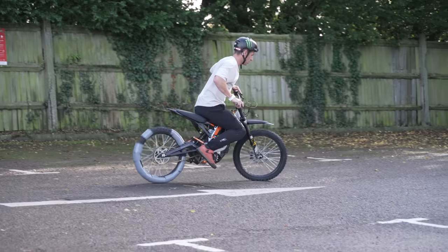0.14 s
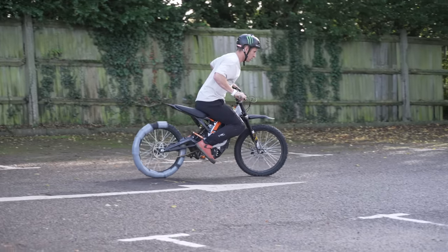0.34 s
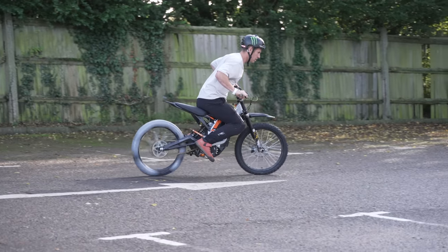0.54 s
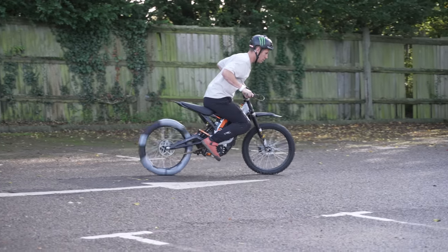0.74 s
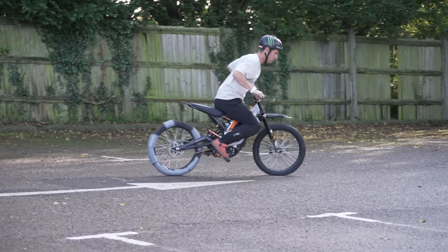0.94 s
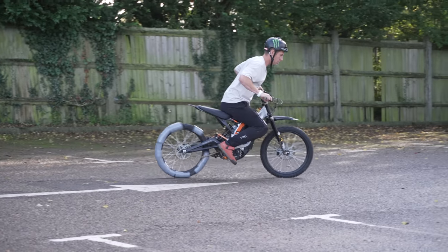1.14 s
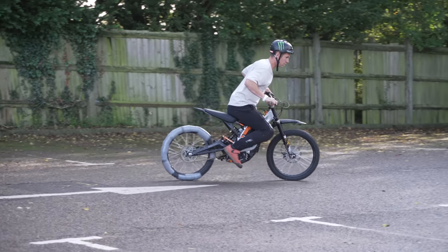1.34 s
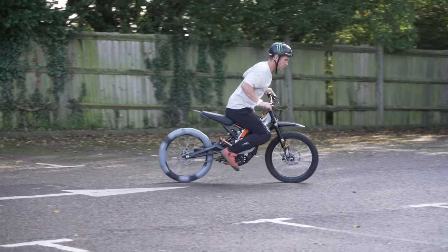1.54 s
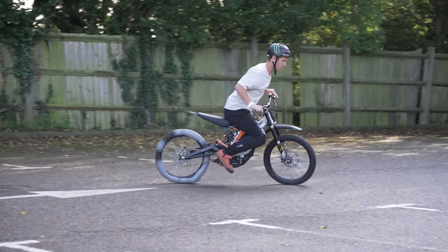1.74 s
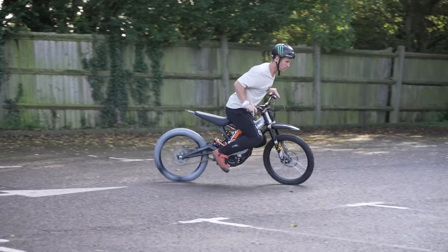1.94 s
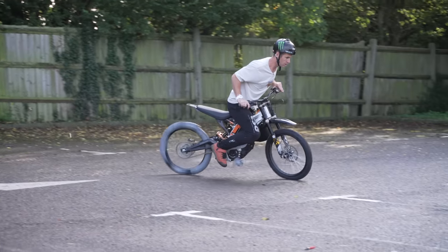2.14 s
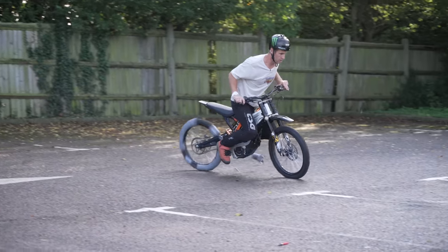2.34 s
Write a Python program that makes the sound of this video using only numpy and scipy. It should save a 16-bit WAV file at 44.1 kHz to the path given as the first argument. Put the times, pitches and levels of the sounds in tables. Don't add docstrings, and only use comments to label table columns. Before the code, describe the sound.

Brittle plastic guttering around a turning tyre rasps, knocks and creaks over gritty car park ground

```python
import sys
import numpy as np
from scipy import signal
from scipy.fft import rfft, irfft
from scipy.io import wavfile
from scipy.ndimage import uniform_filter1d

SR = 44100
rng = np.random.default_rng(int(sys.argv[2]) if len(sys.argv) > 2 else 0)


def voltage_ratio(level):
    return 10 ** (np.asarray(level, float) / 20)


def digitize_waveform(pressure):
    field = np.atleast_2d(pressure).T
    bounded = np.clip(field, -1, 1)
    quanta = np.round(bounded * 32767).astype(np.int16)
    wavfile.write(sys.argv[1], SR, quanta)


N = 110250

# start in seconds, length in seconds, pop level in dB, pop pitch in
# Hz, grit level in dB.
DRAGS = [(.43, 0.061, -43.5, 321.2, -45), (.488, 0.019, -40.5, 2318, -24.5),
         (0.523, 0.038, -32.5, 425.6, -22.5), (0.572, 0.016, -61, 593, -23),
         (.603, 0.012, -63, 1210, -24), (0.615, 0.044, -24, 465.2, -19.5),
         (.6885, 0.049, -26.5, 666.4, -23.5), (.88, 0.074, -37, 2060, -64),
         (.748, 0.013, -38, 900, -19.5), (0.774, 0.014, -36.5, 771, -21.5),
         (0.791, 0.033, -26, 892.6, -19), (0.825, 0.023, -52, 890, -29),
         (1.081, 0.037, -48, 374.5, -35.5), (1.477, 0.017, -43, 867, -28),
         (1.501, 0.005, -32, 960, -18), (1.513, 0.041, -32.5, 571.6, -27),
         (1.535, 0.019, -36, 357.4, -26), (1.606, 0.014, -66, 1480, -36),
         (1.642, 0.022, -42, 399.3, -29), (1.406, 0.0092, -51.5, 530, -50),
         (1.703, 0.048, -37.5, 1346, -64), (1.4, 0.069, -46.5, 399, -39),
         (1.575, 0.12, -43, 349, -38),
         (1.762, 0.014, -37.5, 897, -26.5), (1.77, 0.02, -28.5, 960, -26),
               (1.8, 0.012, -29.5, 923, -24), (1.82, 0.017, -52, 1177, -19),
               (1.857, 0.0056, -41, 785, -18.5), (1.925, 0.055, -64, 1260, -20),
               (1.982, 0.018, -30, 548, -21), (2.018, 0.047, -28.5, 959, -19),
               (2.063, 0.042, -27.5, 1138, -19.5), (2.114, 0.0065, -46, 960, -29),
               (2.132, 0.013, -53, 880, -25), (2.176, .016, -49, 795, -33), (2.194, 0.0096, -33, 763, -23),
               (2.222, 0.032, -31, 795, -23), (2.261, 0.02, -44, 906, -18), (2.323, 0.011, -46.5, 632, -18),
               (2.362, 0.017, -43.5, 781, -38), (2.44, 0.0095, -50, 818, -41),
               (2.493, .012, -26, 920, -22.5)]
# pitch in Hz, width in Hz, level in dB beside a 500 Hz pop.
SHELL_MODES = [(285, 115, -3.5), (381, 43, -12), (572, 14.4, -5)]
# frequency in Hz, level in dB.
GRIT_SPECTRUM = [(150, -3.5), (400, 2.5), (1200, 4), (2600, 2), (3800, 1.5), (7000, -6.5), (12500, -5.5),
                 (16000, -1)]
# time in seconds, level in dB.
RUB = [(0, -42.5), (.3, -39), (.48, -40), (.53, -24), (.85, -25.5), (.94, -29), (1.0, -33.5), (1.2, -40.5),
       (1.4, -51), (1.5, -32.5), (1.58, -32), (1.69, -38.5), (1.77, -19.5), (1.9, -22.5), (2.12, -21.5),
       (2.18, -21.5), (2.31, -24.5), (2.5, -27)]
# start in seconds, peak in dB, pitch in Hz, decay in seconds.
KNOCKS = [(0.211, -19, 1110, 0.023), (0.348, -16, 674, 0.018), (0.495, -6, 2980, 0.02),
          (0.528, -4, 1860, 0.02), (0.536, -10, 1160, 0.023), (0.554, -6, 2530, 0.034),
          (0.577, -8, 2830, 0.02), (0.639, -10, 565, 0.013), (0.689, 2, 2530, 0.038),
          (0.696, 1, 890, 0.015), (0.751, -11, 1720, 0.022), (0.793, -5, 1050, 0.02), (0.81, 4, 970, 0.015),
          (0.822, -1, 920, 0.02), (1.08, -12.5, 1400, 0.031), (1.17, -13.5, 1350, 0.016),
          (1.338, -15.5, 937, 0.026), (1.408, -6, 1760, 0.031), (1.476, -8, 1780, 0.02),
          (1.496, -10, 1200, 0.02), (1.5, -6.5, 990, 0.032), (1.515, -12, 590, 0.016),
          (1.543, -5, 630, 0.01), (1.61, -7.5, 1870, 0.023), (1.702, -17, 910, 0.015),
          (1.715, -9, 641, 0.04), (1.771, 4, 956, 0.017), (1.782, -8, 910, 0.02),
          (1.801, 3.5, 1050, 0.0093), (1.826, -2.5, 2370, 0.02), (1.859, -4.5, 600, 0.018),
          (1.93, -4, 2060, 0.02), (1.945, -13, 1400, 0.012), (1.968, -11, 1880, 0.02),
          (1.991, 4, 570, 0.02), (2.023, 0, 1230, 0.024), (2.039, -6, 2600, 0.018),
          (2.062, -6, 1170, 0.023), (2.091, -1, 1530, 0.023), (2.136, -11, 1380, 0.02),
          (2.194, -7, 750, 0.014), (2.222, -0.5, 1180, 0.045), (2.243, -4, 700, 0.018),
          (2.263, -9, 592, 0.031), (2.279, -14, 816, 0.02), (2.323, -8, 703, 0.033), (2.335, -8, 590, 0.02),
          (2.368, -4, 1360, 0.018), (2.441, -20, 826, 0.018)]
# start in seconds, peak in dB, centre in Hz, decay in seconds.
CRACKS = [(0.0369, -25, 4070, 0.044), (0.0876, -8.5, 8350, 0.015), (.153, -43, 3000, 0.07),
          (0.19, -38, 11000, 0.16), (0.196, -28, 10800, 0.067), (0.271, -30.5, 3020, 0.015),
          (.334, -28, 3830, 0.059), (0.95, -32.5, 13000, 0.066), (1.255, -44, 9400, 0.049),
          (1.002, -39, 4800, .02), (1.027, -31, 7650, 0.044), (1.031, -13, 6000, 0.0037),
          (1.0945, -21.5, 2740, 0.013), (1.112, -35, 5000, 0.017), (1.1517, -21.5, 1570, 0.031),
          (1.182, -35, 4400, 0.041), (1.22, -32, 5000, 0.017), (1.337, -28.5, 3900, 0.022),
          (1.3732, -31, 2530, 0.026), (1.408, -13, 2560, 0.023), (1.453, -24, 10900, 0.022),
          (1.732, -31.5, 11200, 0.15)]
# centre in seconds, peak in dB, pitch in Hz, length in seconds.
SQUEALS = [
    (0.307, -13, 1650, 0.00058),
    (0.494, -22, 2650, 0.0021),
    (.756, -20, 3750, 0.0032),
    (1.662, -13, 1220, 0.0041),
    (1.831, -15.5, 2560, 0.0034),
    (2.118, -10, 4000, 0.0019),
    (2.253, -15, 3670, 0.0045),
]
# time in seconds, slips per second, level in dB.
CREAK = [
    (.296, 730, -28),
    (.315, 690, -23),
    (0.332, 630, -22),
    (0.344, 460, -19),
    (0.349, 480, -13),
    (0.365, 620, -12.5),
    (0.371, 500, -10),
    (0.382, 400, -11),
]
# time in seconds, level in dB.
SLIPS = [(.2756, -24), (.282, -23), (0.288, -24), (0.292, -19), (0.4446, 2.5), (0.4628, 3), (0.479, 3),
         (0.5203, 3.5), (0.5378, -0.5), (1.456, 0.5), (1.4851, 4), (1.5583, 0.5), (1.7567, -0.5)]
# pitch in Hz, level in dB, 60 dB decay in seconds.
JOINT_MODES = [(3200, -30.5, 0.015), (5670, -9, 0.0036), (8780, -3, 0.0031), (9290, -1.5, 0.0034),
               (10000, -5.5, 0.0031), (11800, -9.5, 0.0034), (13300, -13, 0.0034), (15000, -14, .003)]
# frequency in Hz, level in dB.
TRAFFIC_SPECTRUM = [(25, 7), (65, 7), (200, 8), (450, -2), (1000, 3.5), (1700, 2.5), (2600, -19),
                    (16000, -33)]
# centre in seconds, width in seconds, level in dB.
GUSTS = [
    (0.02, 0.031, -30),
    (0.361, 0.023, -38),
    (.44, 0.048, -37),
    (0.746, 0.0066, -15.5),
    (1.03, 0.028, -33),
    (1.241, 0.028, -39.5),
    (1.744, 0.008, -21),
    (1.789, 0.015, -36),
]

ATTACK_S, RELEASE_S = .0015, .0035
POP_WIDTH, POPS_PER_CYCLE, POP_SPREAD_DB, POP_JITTER = .55, .6, 3.0, .4
OVERTONE_DB, SHELL_FALL_DB_PER_OCT = -10.5, -5.5
SHELL_FREE_DB = -24
GRIT_PER_S, GRIT_SPREAD_DB, GRIT_FLUTTER_DB, GRIT_HISS = 700, 2.5, 4.0, .11
FINE_HZ = 5500
FINE_SMEAR_S = .013
RUB_TILT_HZ = 5000
WORN_S, WORN_BRIGHT = 1.77, 0.83
LIFT_DEPTH, LIFT_LEAD_S, LIFT_S = .5, .0025, .0022
KNOCK_DB, KNOCK_WIDTH, KNOCK_SNAP_DB, KNOCK_THUD_DB, KNOCK_THUD_HZ = -6.5, 0.35, -29.5, -6.5, 250
CRACK_WIDTH, CRACK_BROAD_DB, CRACK_RISE_S = 0.6, -9, .0006
SLOW_START_S, SLOW_PERIOD_S, SLOW_DB, SLOW_GROWTH_DB = .3841, .00663, -4.5, .5
JOINT_DB, JOINT_ROUGH, JOINT_ECHO_S, JOINT_ECHO_DB = -1, .35, .0021, -14
TRAFFIC_DB, GUST_HZ = -36.5, 53
RUMBLE_HZ, RUMBLE_DB, RUMBLE_FADE_S = 62.4, -38, 1.87
ECHO_DB, ECHO_T60_S = -22, .2
CEILING, TOP_HZ = .56, 15790


def level(x, db):
    return x * voltage_ratio(db) / np.sqrt(np.mean(x ** 2))


def band(x, hz, width_hz):
    return signal.lfilter(*signal.iirpeak(min(hz, .45 * SR), hz / width_hz, SR), x)


def colour(x, points):
    f = np.fft.rfftfreq(len(x), 1 / SR) + 1
    hz, db = np.array(points).T
    return irfft(rfft(x) * voltage_ratio(np.interp(np.log(f), np.log(hz), db)), len(x))


def walk(rate):
    k = int(SR / rate)
    held = np.repeat(rng.standard_normal(N // k + 1), k)
    return 0.65 * uniform_filter1d(uniform_filter1d(held, k), k)[:N]


def decay_60(u, t60):
    return np.exp(-np.log(1000) * u / t60)


def grit():
    shared, out = walk(70), 0
    for hz in 200 * 2 ** np.arange(0, 6.4, .34):
        chance, sign = rng.random(N), rng.choice([-1., 1.], N)
        size_db = GRIT_SPREAD_DB * rng.exponential(size=N)
        clicks = (chance < GRIT_PER_S * np.sqrt(hz / 2000) / SR) * sign * voltage_ratio(size_db)
        hiss = GRIT_HISS * (1 + (hz / FINE_HZ) ** 2) * rng.standard_normal(N)
        flutter = voltage_ratio(GRIT_FLUTTER_DB * (.5 * shared + 1.51 * walk(110)))
        patch = band(band((clicks + hiss) * flutter, hz, hz * 0.4), hz, hz * 0.58)
        out = out + level(patch, 10 * np.log10(hz))
    return level(colour(out, GRIT_SPECTRUM), 0)


def shell_pops(env, hz, pop_db):
    gap, size = rng.standard_normal((2, 300))
    at = np.cumsum(np.exp(POP_JITTER * gap) * SR / hz / POPS_PER_CYCLE).astype(int)
    inside = at < len(env)
    kick = np.full(len(env), 1e-9)
    kick[at[inside]] = voltage_ratio(POP_SPREAD_DB * size[inside])

    def ring(f, width, db):
        return level(band(band(kick * env, f, width), f, f), db)

    fall = SHELL_FALL_DB_PER_OCT * np.log2(hz / 500)
    damp = max(voltage_ratio(SHELL_FREE_DB - pop_db), 1)
    hollow = sum(ring(f, min(w * damp, f / 2), db + fall) for f, w, db in SHELL_MODES)
    return ring(hz, hz * POP_WIDTH, 0) + ring(hz * 2.21, hz, OVERTONE_DB) + hollow


def drags(t):
    rasp = grit()
    dull = signal.lfilter(*signal.butter(1, RUB_TILT_HZ, fs=SR), rasp)
    fine = rasp - dull
    bright = np.clip((t - WORN_S) / 0.05, 0, 1) * WORN_BRIGHT
    out = (dull + bright * fine) * voltage_ratio(np.interp(t, *np.array(RUB).T))
    push = np.zeros(N)
    for s, length, pop_db, hz, grit_db in DRAGS:
        a = slice(int(s * SR), int((s + length + .08) * SR))
        u = t[a] - s
        env = np.clip(u / ATTACK_S, 0, 1) * np.exp(-np.clip(u - length, 0, None) / RELEASE_S)
        fill = np.sqrt(len(u) / SR / (length + RELEASE_S / 2))
        out[a] += voltage_ratio(pop_db) * fill * shell_pops(env, hz, pop_db)
        out[a] += voltage_ratio(grit_db) * env * dull[a]
        push[a] += voltage_ratio(grit_db) * env
    lift = np.ones(N)
    for s, *_ in KNOCKS:
        lift *= 1 - LIFT_DEPTH * np.exp(-((t - s + LIFT_LEAD_S) / LIFT_S) ** 2)
    return lift * out + fine * uniform_filter1d(push, int(FINE_SMEAR_S * SR))


def peak(x):
    return x / np.abs(x).max()


def knocks(t):
    out = np.zeros(N)
    u = t[:3500]
    thud = peak(band(np.diff(np.exp(-u / 0.00077), prepend=0), KNOCK_THUD_HZ, 250))
    for s, db, hz, decay in KNOCKS:
        hit = rng.standard_normal(len(u)) * decay_60(u, decay)
        body = peak(band(hit, hz, hz * KNOCK_WIDTH))
        snap = peak(band(hit * np.exp(-u / .002), 2500, 6000))
        knock = body + voltage_ratio(KNOCK_SNAP_DB) * snap + voltage_ratio(KNOCK_THUD_DB) * thud
        a = int(s * SR)
        out[a:a + len(u)] += voltage_ratio(db + KNOCK_DB) * knock[:N - a]
    return out


def cracks(t):
    out, noise = np.zeros(N), rng.standard_normal(N)
    for s, db, hz, decay in CRACKS:
        a = slice(int(s * SR), int((s + 0.16) * SR))
        u = t[a] - t[a][0]
        env = (1 - np.exp(-u / CRACK_RISE_S)) * decay_60(u, decay)
        core = level(band(noise[a], hz, hz * CRACK_WIDTH), 0)
        skirt = level(band(noise[a], 10000, 18000), CRACK_BROAD_DB)
        out[a] += voltage_ratio(db) * env * (core + skirt)
    return out


def squeals(t):
    out = np.zeros(N)
    for s, db, hz, length in SQUEALS:
        tone = np.sin(2 * np.pi * hz * (t - s) + 1.3 * walk(1000))
        out += voltage_ratio(db) * np.exp(-((t - s) / length) ** 2) * tone
    return out


def joint(t):
    when, rate, db = np.array(CREAK).T
    phase = np.cumsum(np.interp(t, when, rate, 0, 0)) / SR
    slipped = np.diff(np.floor(phase), prepend=0) > 0
    kick = slipped * voltage_ratio(np.interp(t, when, db) + rng.standard_normal(N))
    k = np.arange(8)
    step_s = SLOW_START_S + k * SLOW_PERIOD_S + .0002 * rng.standard_normal(len(k))
    steps = np.c_[step_s, SLOW_DB + k * SLOW_GROWTH_DB]
    for s, db in [*steps, *SLIPS]:
        kick[int(s * SR)] += voltage_ratio(db)
    u = t[:900]
    ring = sum(voltage_ratio(d) * np.sin(2 * np.pi * hz * u) * decay_60(u, t60) for hz, d, t60 in JOINT_MODES)
    ring = ring * (1 - np.exp(-u / .0004))
    direct = signal.fftconvolve(kick, ring)[:N] * voltage_ratio(JOINT_DB) * (1 + JOINT_ROUGH * walk(6000))
    bounce = np.roll(direct, int(JOINT_ECHO_S * SR)) * (1 + 0.78 * rng.standard_normal(N))
    return direct + voltage_ratio(JOINT_ECHO_DB) * bounce


def echo(wheel, t):
    u = t[:SR // 3]
    tail = band(rng.standard_normal(len(u)), 2140, 5800) * decay_60(u, ECHO_T60_S) * (u > .003)
    return voltage_ratio(ECHO_DB) * signal.fftconvolve(wheel, tail / np.sqrt(np.sum(tail ** 2)))[:N]


def traffic(t):
    far = level(colour(rng.standard_normal(N), TRAFFIC_SPECTRUM), TRAFFIC_DB) * voltage_ratio(2.5 * walk(6))
    rumble = band(band(rng.standard_normal(N), RUMBLE_HZ, 29), RUMBLE_HZ, 69)
    fade_db = -9 / (1 + np.exp((RUMBLE_FADE_S - t) / 0.097))
    return far + level(rumble, RUMBLE_DB) * voltage_ratio(1.8 * walk(10.0) + fade_db)


def wind(t):
    low = level(band(rng.standard_normal(N), GUST_HZ, 67), -5.5)
    out = np.zeros(N)
    for s, width, db in GUSTS:
        swing = np.sin(2 * np.pi * GUST_HZ * (t - s))
        out += voltage_ratio(db) * np.exp(-((t - s) / width) ** 2) * (swing + low)
    return out


def scene():
    t = np.arange(N) / SR
    wheel = drags(t) + knocks(t) + cracks(t) + squeals(t) + joint(t)
    return (wheel + echo(wheel, t) + traffic(t) + wind(t))[None]


def low_pass(x):
    return signal.sosfilt(signal.butter(12, 16850, fs=SR, output="sos"), x)


def record(dry):
    rounded = dry / (1 + (dry / CEILING) ** 4) ** .25
    top_cut = signal.ellip(10, .2, 45, TOP_HZ, fs=SR, output="sos")
    mix = signal.sosfilt(top_cut, rounded)
    return low_pass(mix)


dry = scene()
out = record(dry)
digitize_waveform(out)
```